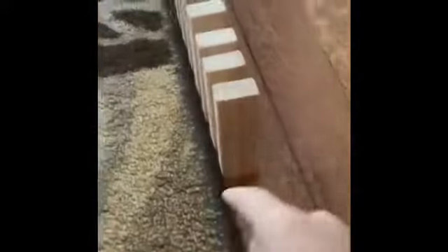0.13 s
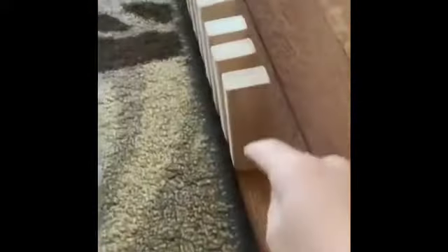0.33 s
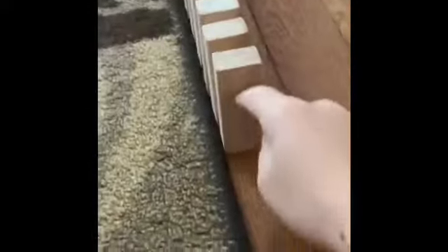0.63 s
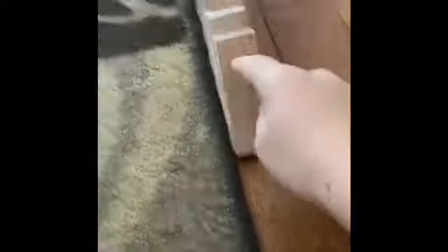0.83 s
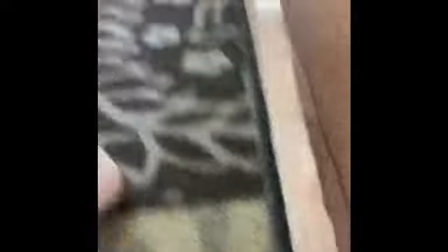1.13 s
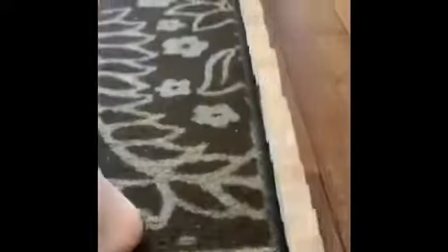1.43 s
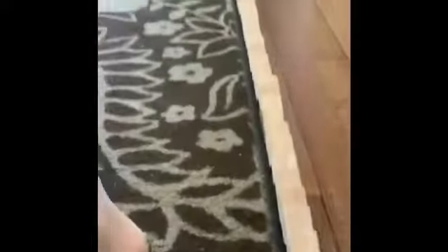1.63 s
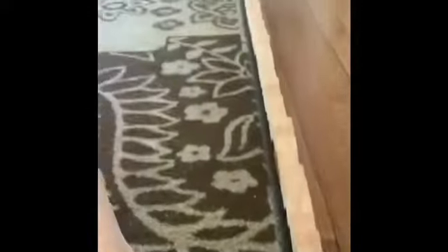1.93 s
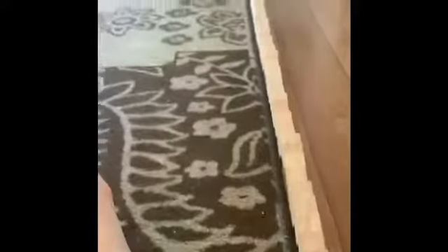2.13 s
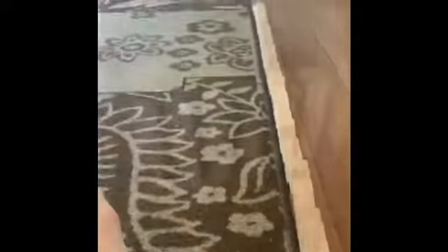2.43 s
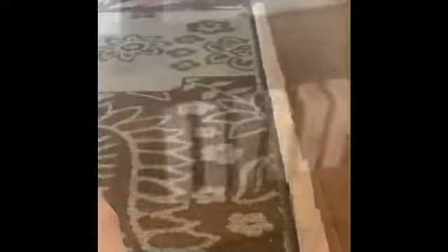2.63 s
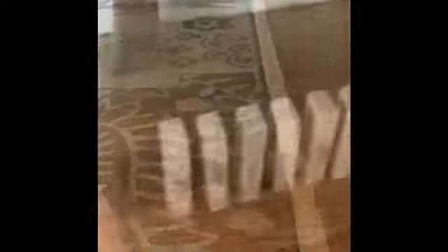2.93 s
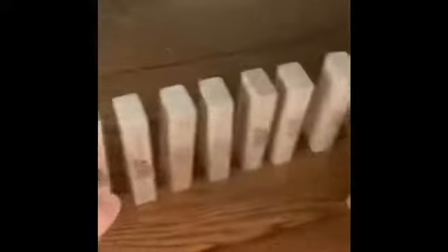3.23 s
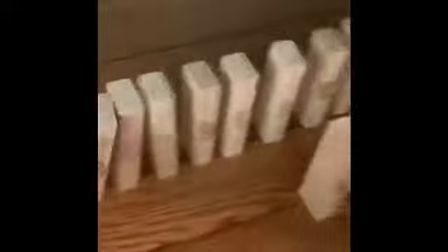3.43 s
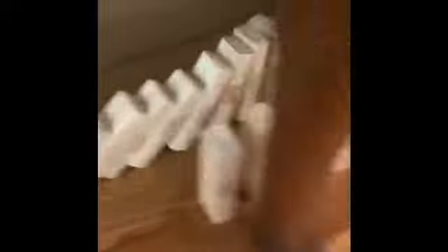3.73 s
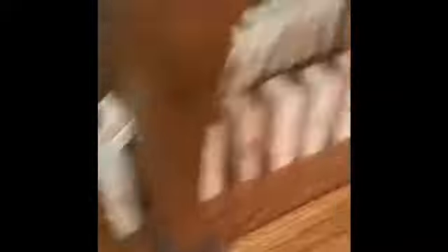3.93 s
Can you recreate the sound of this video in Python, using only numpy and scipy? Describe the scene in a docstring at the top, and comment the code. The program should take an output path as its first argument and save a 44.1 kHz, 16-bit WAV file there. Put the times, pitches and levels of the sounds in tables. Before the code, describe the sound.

Quiet room air with a barely audible wavering tone near 865 Hz. Two soft, dull bumps come at about 0.05 and 0.4 s. From 0.67 s wooden blocks begin to topple: first small clicks, then by 1.0 s a strong, dense clatter of roughly thirty sharp clacks per second, bright around 5-6 kHz, with hollow knocks near 800 Hz and low floor thuds. Fallen blocks chatter beneath. The row recedes, becoming more reverberant, with an accented clack at 1.73 s, and ends in a loud crash at 2.14 s, a quick tumble and a low boom fading over half a second. Near quiet follows, with one faint hollow knock at 2.9 s. A second row starts at 3.3 s with sparse, muted taps, gathers speed from 3.6 s, hits hard around 3.68-3.75 s, and keeps rattling, with settling thumps and slightly rising room noise, until the sound stops at about 4.1 s.

```python
"""Two rows of wooden blocks topple like dominoes on a wooden floor in a living room.
Each strike layers a noise crack, a hollow board knock and a low floor thud; most add short wood modes.
The first row runs away from the listener and ends in a booming crash; after a lone knock the second
starts slowly and gathers speed. Fallen blocks chatter and settle as coloured grains.
Beneath lie quiet room air, a faint wavering tone and two soft bumps before the first row."""
import sys
import numpy as np
from scipy import signal
from scipy.fft import rfft, irfft, next_fast_len
from scipy.io import wavfile
from scipy.ndimage import uniform_filter1d

SR = 44100
rng = np.random.default_rng(int(sys.argv[2]) if len(sys.argv) > 2 else 0)


def waveform_to_disk(signal):
    """Save audio, clipped to [-1, 1], as 16-bit WAV at the path in sys.argv[1]."""
    frames = np.transpose(np.atleast_2d(signal))
    scaled = np.clip(frames, -1, 1) * 32767
    samples = np.round(scaled).astype(np.int16)
    wavfile.write(sys.argv[1], SR, samples)


N = 180280

# Colour of the hollow knock, one curve for each row of blocks: f/Hz, relative level/dB
KNOCK_SPECTRA = [
    [(200, -14), (380, 4), (540, -6.5), (740, 5.5), (1150, -1), (1650, -7), (2600, -14.5), (5000, -36.5)],
    [(200, -13.5), (580, -6), (860, 5), (1040, 2), (1200, -10), (1550, -12), (5000, -42.5)],
]
# Colour of the low floor boards, one curve for each row of blocks: f/Hz, relative level/dB
BOARD_SPECTRA = [
    [(40, -28), (68, -6), (86, 4), (105, -0.5), (129, 6.5), (150, 0), (175, 3.5), (250, 1.5), (340, -1),
     (800, -52.5)],
    [(40, -34), (125, -8), (150, -13.5), (174, 7.5), (240, 1), (305, 4.5), (380, -9), (460, -4.5),
     (900, -55)],
]
# Stages of the toppling: first row, its crash, a lone hollow knock, second row on another part of the floor
# start t/s, first chatter before softness/s, knock t60/s, thud trim level/dB, rebound over strike level/dB
STAGES = [(0.6, 0.0045, 0.048, -1.5, -14), (2.099, 0.034, 0.043, -2, -12.5), (2.8, 0.003, 0.016, -8, -18.5),
          (3.2, 0.011, 0.05, -2, -10.5)]


def amp(db):
    """Decibels to gain."""
    return 10 ** (np.asarray(db) / 20)


def unit(x):
    """Scale to rms 1."""
    return x / np.sqrt(np.mean(x ** 2) + 1e-20)


def blow(x):
    """Scale a transient to the energy of 5 ms at rms 1."""
    return x * np.sqrt(0.005 * SR / (np.sum(x ** 2) + 1e-20))


def fade(t, t60):
    """Exponential decay by 60 dB in t60 seconds."""
    return np.exp(-np.log(1000) * t / max(t60, 1e-4))


def along(points, hz):
    """Interpolate (f/Hz, value) points on a log frequency axis."""
    f, v = np.transpose(points)
    return np.interp(np.log(hz + 1), np.log(f + 1), v)


def curves(rows):
    """One smoothed gain envelope for each dB column, at -120 dB outside the rows."""
    s, *columns = np.transpose(rows)
    t = np.arange(N) / SR
    envelopes = [amp(np.interp(t, s, column, left=-120, right=-120)) for column in columns]
    return [uniform_filter1d(envelope, size=800) for envelope in envelopes]


def add(track, s, x):
    """Mix x into the track at time s."""
    i = max(round(s * SR), 0)
    track[i:i + len(x)] += x[:len(track) - i]


def response(spectrum, size=4096):
    """Minimum-phase impulse response with the given spectrum, by folding the cepstrum."""
    cepstrum = irfft(np.log(amp(along(spectrum, np.fft.rfftfreq(size, 1 / SR)))))
    cepstrum[1:size // 2] *= 2
    cepstrum[size // 2 + 1:] = 0
    return irfft(np.exp(rfft(cepstrum)))


def through(x, body):
    """x drives a body with this impulse response."""
    return signal.fftconvolve(x, body)[:len(x)]


def noise(spectrum):
    """Steady coloured noise of rms 1."""
    gain = amp(along(spectrum, np.fft.rfftfreq(N, 1 / SR)))
    return unit(irfft(rfft(rng.standard_normal(N)) * gain, N))


def grains(rate, t60, scatter_db, spectrum):
    """Short coloured noise bursts of random size at random times, rate per second, rms 1."""
    sizes = amp(scatter_db * rng.standard_normal(N).clip(-2, 2))
    slips = (rng.random(N) < rate / SR) * sizes
    envelope = through(slips, fade(np.arange(SR // 25) / SR, t60))
    bursts = envelope * rng.standard_normal(N)
    return unit(through(bursts, response(spectrum)))


def room_air():
    """Coloured noise whose level drifts: the quiet bed of the room."""
    # Colour of the air: f/Hz, relative level/dB
    air_spectrum = [(25, -32), (60, 3), (110, 2.5), (220, -6), (400, -2), (1300, -17), (6400, -36.5),
                    (16000, -46)]
    # Rms of the air: t/s, level/dB
    air_level = [(0, -51.5), (0.601, -51.5), (2.601, -54.5), (3.2, -50), (4.09, -40.5)]
    s, db = np.transpose(air_level)
    return amp(np.interp(np.arange(N) / SR, s, db)) * noise(air_spectrum)


def wavering_tone():
    """A faint sine near 865 Hz whose pitch wanders by 4 Hz rms on smoothed noise."""
    drift_hz = 4 * unit(uniform_filter1d(rng.standard_normal(N), size=2000))
    return amp(-64.5) * np.sin(2 * np.pi * np.cumsum(865 + drift_hz) / SR)


def soft_bumps():
    """Dull noise bumps with a ramped attack and an exponential decay."""
    # Bumps before the push: t/s, level/dB, rise/s, t60/s
    bumps = [(0.025, -44, 0.044, 0.72), (0.389, -46.5, 0.045, 0.44)]
    # Colour of a bump: f/Hz, relative level/dB
    bump_spectrum = [(90, -45), (260, 14), (310, -6.5), (440, 10), (600, -3), (2000, -40)]
    out, t = np.zeros(N), np.arange(N) / SR
    for start, level_db, rise, t60 in bumps:
        envelope = np.minimum(t / rise, 1) * fade(np.maximum(t - rise, 0), t60)
        add(out, start, amp(level_db) * noise(bump_spectrum) * envelope)
    return out


def room(x, wall_db, count=8):
    """Sparse early reflections and a slower diffuse tail, redrawn every 50 ms and crossfaded."""
    # Decay of the room: f/Hz, t60/s
    room_decay = [(100, 0.92), (330, 0.11), (750, 0.41), (4850, 0.27), (12800, 0.28)]
    out, step = np.zeros(N), SR // 20
    for start in range(0, N, step):
        hz, t, bins = signal.stft(rng.standard_normal(SR * 2 // 3), SR, nperseg=256)
        decay = amp(-60 * t / along(room_decay, hz)[:, None])
        tail = signal.istft(bins * decay, SR, nperseg=256)[1]
        tail *= 1 - fade(np.arange(len(tail)) / SR, 0.045)  # the diffuse part builds up
        tail /= np.linalg.norm(tail)
        walls = (rng.uniform(0.003, 0.025, count) * SR).astype(int)
        tail[walls] += amp(wall_db) * rng.standard_normal(count)
        part = x[start:start + 2 * step]
        window = np.sin(np.pi * np.arange(len(part)) / (2 * step))
        add(out, start / SR, signal.fftconvolve(part * window, tail))
    return out


def crash_boom():
    """The end of the first row leaves the floor booming, with a thin, slightly rough high ring."""
    # Decaying partials: t/s, mean f/Hz, level/dB, t60/s
    crash_partials = [(1.99, 85, -33, 1), (2.119, 134.3, -42, .6), (2.135, 180, -36, .7),
                      (2.145, 232, -35.5, .5), (2.146, 6800, -38, .48)]
    out, t = np.zeros(N), np.arange(SR) / SR
    for s, hz, db, t60 in crash_partials:
        phase = np.cumsum(hz * (1 + 0.14 * rng.standard_normal(SR))) / SR  # jitter roughens the tone
        envelope = fade(t, t60) * (1 - fade(t, 0.04))
        add(out, s, amp(db) * np.sin(2 * np.pi * phase) * envelope)
    return out


def settling():
    """Leaning blocks slip on each other in tiny ticks and knocks, and thump the floor as they sink."""
    # Fallen blocks, one table for each row, before the layer trims:
    # t/s, knocking level/dB, ticking level/dB, floor thumping level/dB
    settling_levels = [
        [(0.85, -43, -48.5, -37.5), (1.1, -30, -34, -31.5), (1.3, -29.5, -35, -35), (1.6, -27.5, -33, -35.5),
         (2.02, -38.5, -32, -41), (2.12, -52, -48, -40.5)],
        [(3.34, -40, -68.5, -61), (3.58, -67, -74, -43), (3.74, -39, -33.5, -31), (3.87, -38, -50, -29.5),
         (4.09, -26.5, -31.5, -27)],
    ]
    # Colour of the ticks: f/Hz, relative level/dB
    tick_spectrum = [(1500, 7), (3200, -6.5), (6100, -4), (8000, 1), (9300, 7), (10800, -21.5),
                     (15000, -24)]
    wood, floor = np.zeros(N), np.zeros(N)
    for rows, knock, boards in zip(settling_levels, KNOCK_SPECTRA, BOARD_SPECTRA):
        knocking, ticking, thumping = curves(rows)
        knocks = grains(rate=170, t60=0.022, scatter_db=3, spectrum=knock)
        ticks = grains(rate=170, t60=0.008, scatter_db=4, spectrum=tick_spectrum)
        thumps = grains(rate=110, t60=0.045, scatter_db=2, spectrum=boards)
        wood += amp(-10.5) * knocking * knocks
        wood += amp(-6.5) * ticking * ticks
        floor += amp(-9) * thumping * thumps
    return wood, floor


def stage_at(s):
    """Which stage of the toppling is under way at time s."""
    return sum(s > later[0] for later in STAGES[1:])


def tumble(count=12):
    """Loose blocks tumble after the crash, ever softer: cracks and knocks with no ring layer."""
    start_s, length_s = 2.153, 0.12
    first_crack_db, fall_db_per_s = -29, 162.5
    knock_over_crack_db = -19
    rows = []
    for k in range(count):
        late = length_s * (k + rng.random()) / count
        db = first_crack_db - fall_db_per_s * late
        rows.append((start_s + late, db, db + knock_over_crack_db, []))
    return rows


def contacts():
    """Strikes, their softer rebounds and the tumble: t/s, crack level/dB, knock level/dB, notes."""
    # Ringing strikes of block on block: t/s, main ring f/Hz, main ring level/dB,
    # upper ring f/Hz, upper ring level/dB, crack level/dB, board knock level/dB
    ringing_strikes = [(0.6726, 5900, -51, 9300, -54, -47.5, -54), (0.7157, 5000, -41, 9070, -46, -39, -45),
                       (0.7687, 5300, -25.5, 9300, -37, -39.5, -39.5),
                       (0.8545, 5000, -29, 8420, -39, -34.5, -35),
                       (0.8978, 5450, -33.5, 8360.0, -53.5, -34.5, -33.5),
                       (0.9391, 5950.0, -30.5, 8300, -27, -29.5, -34),
                       (0.9759, 5300, -23.5, 8880.0, -30, -30.5, -34.5),
                       (1.034, 5400, -24.5, 8900, -30.5, -25.5, -22),
                       (1.0665, 5600, -17.5, 9640.0, -45.5, -27, -25),
                       (1.0929, 5950, -20.5, 8400, -28.5, -26, -29.5),
                       (1.1272, 5840.0, -31, 9580.0, -36.5, -35, -32),
                       (1.1388, 5550, -25, 8600, -21.5, -24.5, -40.5),
                       (1.1676, 5640, -19, 9300, -27.5, -28.5, -36.0),
                       (1.2, 5370, -22.5, 8930, -26.5, -29, -33),
                       (1.2257, 5840, -25.5, 9100, -35, -33.0, -35),
                       (1.256, 5590, -20.5, 9190.0, -30.5, -35.5, -34.5),
                       (1.2751, 5370, -32.5, 9200, -42.5, -39.5, -34),
                       (1.3034, 5900, -25.5, 9140, -42, -35, -34),
                       (1.3277, 5440, -29.5, 9230, -33, -37, -36), (1.3645, 5680, -18, 9040, -36, -30, -31),
                       (1.3949, 5470.0, -32, 8540, -33.5, -37, -32),
                       (1.4116, 5620.0, -27.0, 9300, -33.0, -32.5, -30.5),
                       (1.4407, 5670, -19.5, 8600, -29, -32.5, -31),
                       (1.47, 5530, -21.5, 8410, -25, -28.5, -31),
                       (1.4893, 5520.0, -34.5, 9500, -36, -32.5, -32.5),
                       (1.4969, 7240.0, -43.5, 8450, -28, -47, -39.5),
                       (1.5171, 5690.0, -21.5, 9430, -36, -33.5, -34.5),
                       (1.5444, 6700, -29.0, 9120.0, -41.5, -31, -30.5),
                       (1.5699, 5880, -26, 9050, -33.5, -35, -33),
                       (1.6062, 5780.0, -32, 9200, -42.5, -41.5, -32.5),
                       (1.6345, 5800, -35.5, 9310.0, -51, -41, -40),
                       (1.6563, 6040, -36.5, 7850, -36.5, -40, -40),
                       (1.6772, 5900, -35, 8700, -42, -36.5, -36),
                       (1.6872, 5340, -33, 8600, -41, -39.5, -36.0),
                       (1.7293, 5670.0, -20.5, 9360, -30.5, -21, -28),
                       (1.7344, 5700, -34, 9810.0, -51, -39.5, -41.5),
                       (1.784, 5800, -29, 9420.0, -34.5, -39.5, -40.5),
                       (1.7997, 5880, -18, 9640, -30.0, -33, -49),
                       (1.8443, 5840, -32, 9450.0, -39.5, -39.5, -41),
                       (1.879, 5880, -24, 9460.0, -46.5, -33.5, -38.5),
                       (1.9053, 5840, -29.5, 9500.0, -41.5, -33.5, -35.5),
                       (1.957, 5960, -31.5, 9200, -43.5, -39.0, -36),
                       (1.9786, 6000, -25, 9500, -40, -34.0, -38.5),
                       (2.0036, 5200, -34, 8930, -40, -32, -35),
                       (2.0261, 5230, -33.0, 9850, -41, -33.5, -34.5),
                       (2.739, 7010, -70, 9300, -68, -71, -75), (3.3212, 6080, -50, 8680, -37, -37, -36.5),
                       (3.4271, 5470, -62, 9300, -42.5, -49, -40),
                       (3.505, 5940, -41.5, 9360, -38.5, -41.5, -39.5),
                       (3.5482, 5900, -41, 9080, -39, -38, -38), (3.6798, 6850, -29, 8870, -23, -26.5, -27),
                       (3.6967, 5140.0, -33, 8770, -30.5, -31.5, -22.5),
                       (3.7357, 5400, -25.5, 8660, -32.0, -27, -26.5),
                       (3.7517, 7000, -24, 9340, -30.5, -29.5, -27),
                       (3.7836, 7230.0, -29, 8560, -31, -38.5, -29.0),
                       (3.802, 5400, -35, 9180, -29, -34.5, -42.5),
                       (3.821, 6510.0, -34.5, 8900, -43.0, -36, -32),
                       (3.9122, 5050, -39, 9560, -35.5, -33, -32),
                       (3.934, 5900, -33.5, 9500, -26.5, -28.5, -31.5),
                       (3.9946, 5460, -35.5, 9020.0, -28.5, -37, -34),
                       (4.0334, 5440.0, -35, 9450, -27, -30, -41),
                       (4.0609, 6140, -32, 9380.0, -25, -34.5, -31.5)]
    # Duller strikes, mostly crack and board knock, including the crash and the lone knock:
    # t/s, crack level/dB, board knock level/dB
    dull_strikes = [(0.8092, -32, -37), (0.9042, -37, -33), (1.0086, -23.5, -22), (1.118, -28, -26),
                    (1.593, -34.5, -26), (1.924, -29.5, -37.5), (2.1145, -22.5, -30), (2.129, -46, -37),
                    (2.1438, -15, -23), (2.9083, -45.5, -37), (3.3395, -52, -50), (3.3682, -48, -36.5),
                    (3.4391, -49.5, -42.5), (3.609, -32.5, -28.5), (3.6509, -30, -32.5),
                    (3.659, -32.5, -26), (3.7167, -35, -32.5), (3.7643, -43, -34.5), (3.8452, -34.5, -42),
                    (3.8781, -33.5, -35.5), (3.9473, -38, -31.5), (3.9773, -31.5, -32.5),
                    (4.018, -34.5, -36.5)]
    strikes = []
    for s, main_hz, main_db, upper_hz, upper_db, crack_db, knock_db in ringing_strikes:
        strikes.append((s, crack_db, knock_db, [(main_hz, main_db), (upper_hz, upper_db)]))
    for s, crack_db, knock_db in dull_strikes:
        strikes.append((s, crack_db, knock_db, []))
    rows = list(strikes)
    for s, crack_db, knock_db, notes in strikes:
        late = rng.uniform(0.006, 0.017)  # s until the struck block rocks back and touches again
        change_db = STAGES[stage_at(s)][-1]
        softer_notes = [(hz, db + change_db) for hz, db in notes]
        rows.append((s + late, crack_db + change_db, knock_db + change_db, softer_notes))
    return rows + tumble()


def contact(t, chatter, bounce_rate, bounce_size):
    """One sharp blow, then dying micro-bounces as the faces meet."""
    bounces = rng.random(len(t)) < bounce_rate / SR
    force = bounce_size * rng.standard_normal(len(t)) * bounces * fade(t, chatter)
    force[0] = 1
    return force


def ring(t, hz, modes):
    """Heavily damped wood modes around hz, which overlap into one broad peak."""
    pitch_scatter, level_scatter_db = 0.028, 2  # no two blocks are alike: side modes vary
    strongest_db = max(mode[1] for mode in modes)
    out = np.zeros(len(t))
    for k, (ratio, db, t60) in enumerate(modes):
        detune, tilt = rng.standard_normal(2) * (db < strongest_db)
        mode_hz = hz * ratio * (1 + pitch_scatter * detune)
        mode = np.sin(2 * np.pi * mode_hz * t) * fade(t, t60)
        mode_gain = (-1) ** k * amp(db + level_scatter_db * tilt)
        out += mode_gain * blow(mode * (1 - fade(t, 0.002)))
    return out


def block_rings(t, force, notes):
    """The contact force excites the block's main and upper groups of modes."""
    # Modes around the main note: pitch ratio, relative level/dB, t60/s
    main_modes = [(.76, -12.5, 0.0047), (.89, -6, 0.0025), (1, 0.5, .0058), (1.27, -11, 0.021)]
    # Modes around the upper note: pitch ratio, relative level/dB, t60/s
    upper_modes = [(.95, -10, 0.01), (1.001, 1.5, .026), (1.079, -15.5, 0.0094)]
    out = np.zeros(len(t))
    for (hz, db), modes in zip(notes, (main_modes, upper_modes)):
        out += amp(db) * blow(through(force, ring(t, hz, modes)))
    return out


def grinding_crack(t, t60, rings, crack):
    """Rough faces grind for a moment, which spreads the crack over a millisecond or more."""
    rise = 0.0018 if rings else 0.008  # s; ringing strikes start sharply, duller ones swell
    grind = rng.standard_normal(len(t)) * fade(t, t60) * (1 - fade(t, rise))
    return blow(through(grind, crack))


def board_knock(t, t60, body):
    """Many crowded board modes, as shaped noise, around a few hollow notes."""
    # Hollow notes of the board under a block, before scatter: f/Hz, relative level/dB, t60/s
    plank_modes = [(772, 1, 0.087), (868.6, 6.5, .058), (1010, 2, .05), (1590, -13, .05)]
    planks = rng.standard_normal(len(t)) * fade(t, t60)
    hollow = np.zeros(len(t))
    for hz, db, mode_t60 in plank_modes:
        gain = amp(db + 3 * rng.standard_normal())
        mode_hz = hz * (1 + 0.021 * rng.standard_normal())
        hollow += gain * np.sin(2 * np.pi * (mode_hz * t + rng.random())) * fade(t, mode_t60)
    knock = blow(through(planks, body)) + amp(-3.5) * blow(hollow)
    return blow(knock * (1 - fade(t, 0.0032)))


def floor_thud(t, boards):
    """A decaying noise push drives the low resonances of the floor."""
    return blow(through(rng.standard_normal(len(t)) * fade(t, 0.08), boards))


def clacks():
    """Every contact cracks, rings any notes it has, and knocks the boards beneath it."""
    # Colour of the crack: f/Hz, relative level/dB
    crack_spectrum = [(500, -16), (1550, 5.5), (2200, 2.5), (3000, 1), (5500, 3.5), (7800, -2), (9200, 0),
                      (10800, -12), (15000, -21)]
    # Very short, hard clicks on top of the strikes: t/s, level/dB
    hard_clicks = [(1.0668, -28), (1.7296, -22), (3.6815, -29)]
    usual_peak_db, usual_knock_db = -22.5, -34  # an ordinary blow
    contact_halves_db = 13  # a hard hit is a clean one: contact time halves for this much more level
    chatter_grows = 0.014  # s per s of toppling before softness, as more blocks lean on the front one
    grind_s = 0.01  # extra grinding t60 at ordinary softness
    floor_follows = 0.5  # dB of floor thud per dB of knock

    wood, floor = np.zeros(N), np.zeros(N)
    t = np.arange(SR // 16) / SR  # life of a clack
    slow = np.arange(SR // 5) / SR  # life of a floor thud
    crack = response(crack_spectrum)
    knock_bodies = [response(spectrum) for spectrum in KNOCK_SPECTRA]
    board_bodies = [response(spectrum) for spectrum in BOARD_SPECTRA]
    for s, crack_db, knock_db, notes in contacts():
        stage = stage_at(s)
        start, first_chatter, knock_t60, thud_db, _ = STAGES[stage]
        row = int(stage == len(STAGES) - 1)
        loudest_db = max([crack_db] + [db for _, db in notes])
        softness = min(0.5 ** ((loudest_db - usual_peak_db) / contact_halves_db), 1.3)
        chatter = softness * (first_chatter + chatter_grows * (s - start))
        force = contact(t, chatter, bounce_rate=3200, bounce_size=0.64)  # rate in bounces per s
        add(wood, s, block_rings(t, force, notes))
        grind_t60 = chatter + softness * grind_s
        add(wood, s, amp(crack_db) * grinding_crack(t, grind_t60, bool(notes), crack))
        add(wood, s, amp(knock_db) * board_knock(t, knock_t60, knock_bodies[row]))
        floor_db = usual_knock_db + floor_follows * (knock_db - usual_knock_db)
        add(floor, s, amp(floor_db + thud_db) * floor_thud(slow, board_bodies[row]))
    for s, db in hard_clicks:
        add(wood, s, amp(db) * blow(crack))
    return wood, floor


def scene():
    """Strikes and settling blocks, dry and through the room, over the floor and the background."""
    # Room send, mostly rising as a row runs away: t/s, level/dB
    room_send = [(0.701, -15.5), (1.3, -12.5), (1.748, -8), (2.032, -7.5), (2.141, -4.5), (2.9, -17.5),
                 (4.051, -9)]
    background = room_air() + wavering_tone() + soft_bumps()
    slips, rumble = settling()
    strikes, thuds = clacks()
    wood = strikes + slips
    send = amp(np.interp(np.arange(N) / SR, *np.transpose(room_send)))
    reverb = room(send * (wood + thuds), wall_db=-23.0)
    floor = thuds + rumble + crash_boom()
    return (wood + reverb + floor + background)[None]


def record(dry):
    """A small microphone loses the deep bass; the recorder keeps nothing above its band limit."""
    mic_low_hz, top_hz = 48, 16200
    high_pass = signal.butter(3, mic_low_hz, "highpass", fs=SR, output="sos")
    thin = signal.sosfilt(high_pass, dry)
    m = next_fast_len(N + SR // 4)
    kept = np.fft.rfftfreq(m, 1 / SR) < top_hz
    return irfft(rfft(thin, m) * kept, m)[:, :N]


dry = scene()
out = record(dry)
waveform_to_disk(out)
```